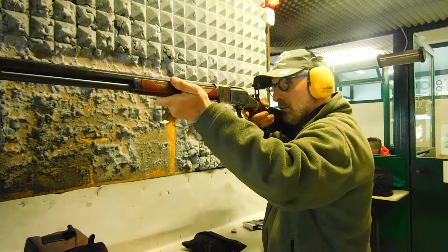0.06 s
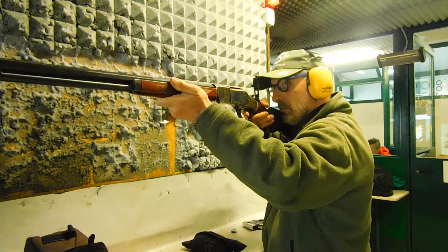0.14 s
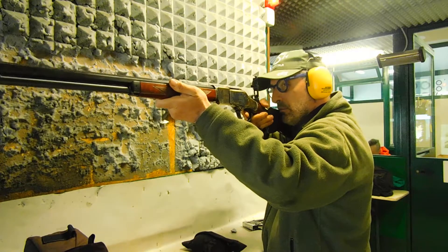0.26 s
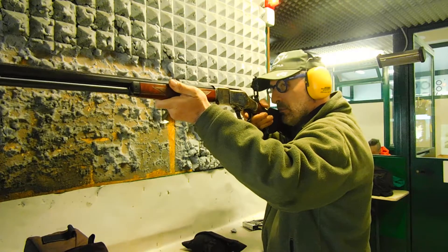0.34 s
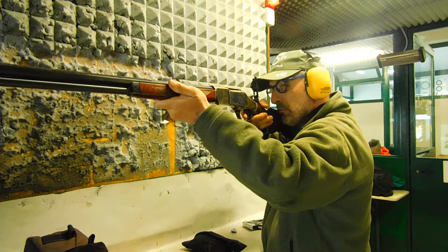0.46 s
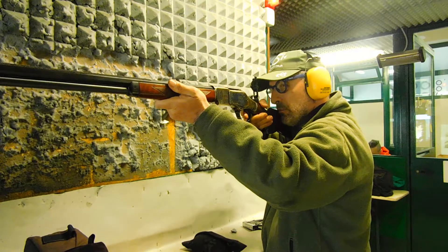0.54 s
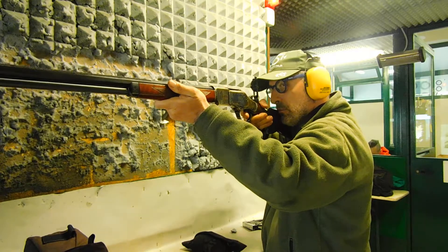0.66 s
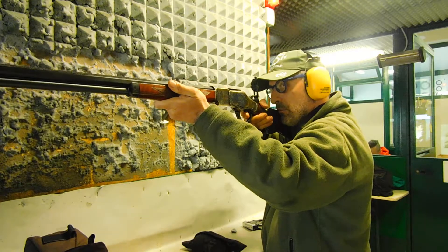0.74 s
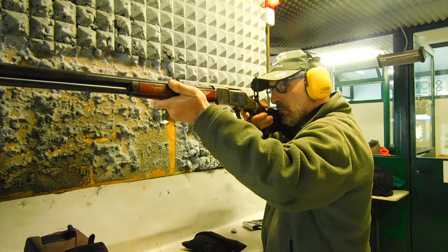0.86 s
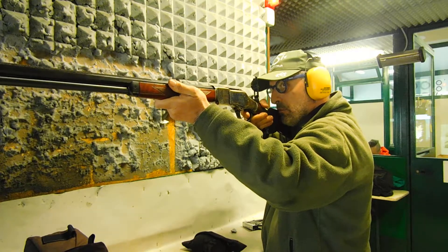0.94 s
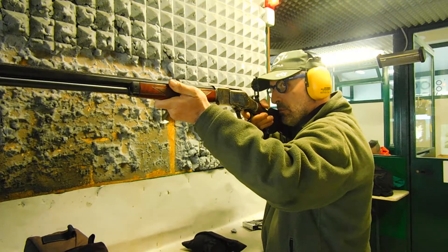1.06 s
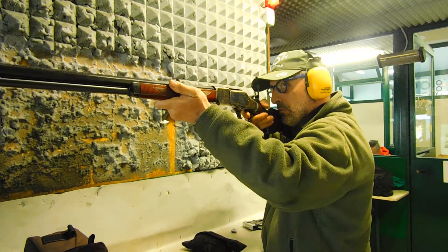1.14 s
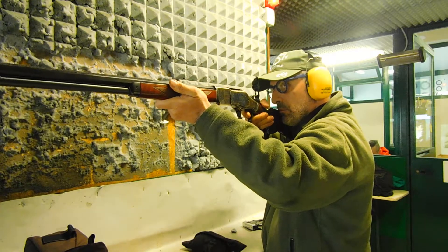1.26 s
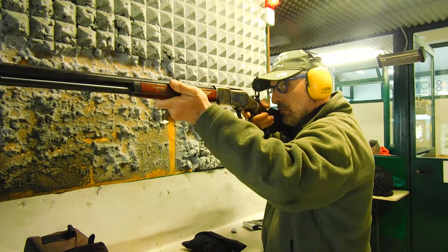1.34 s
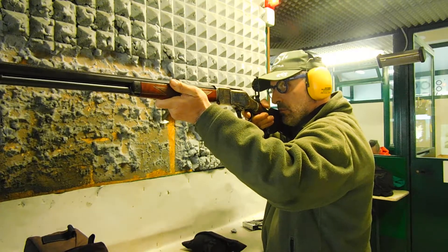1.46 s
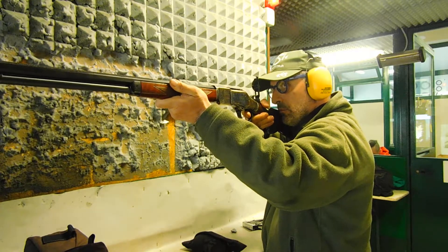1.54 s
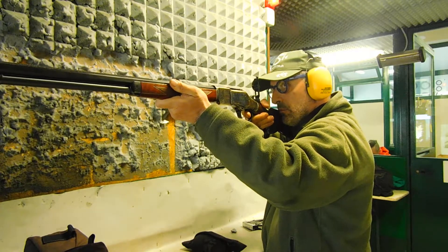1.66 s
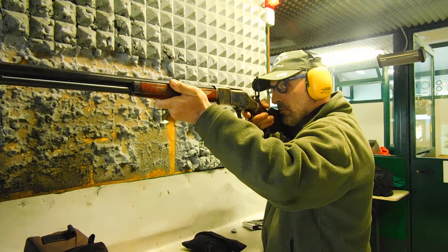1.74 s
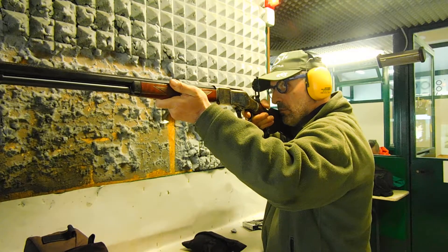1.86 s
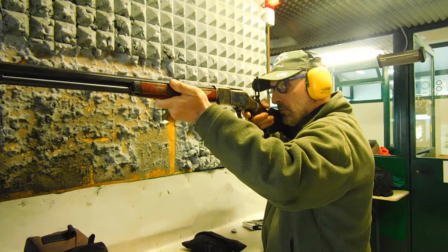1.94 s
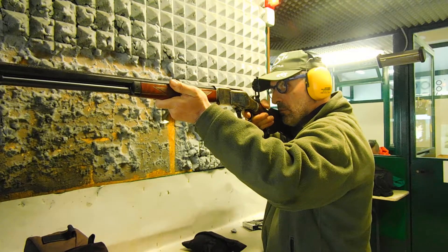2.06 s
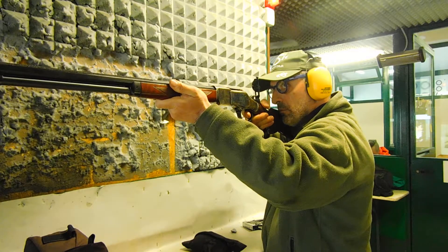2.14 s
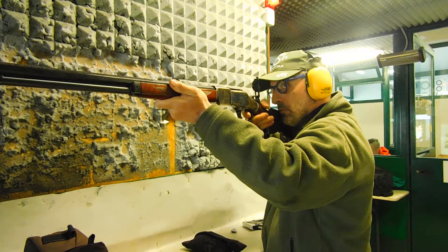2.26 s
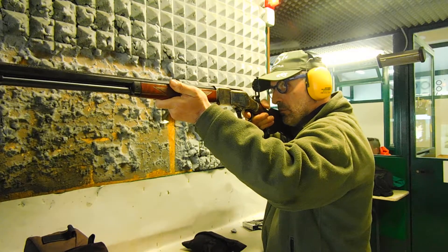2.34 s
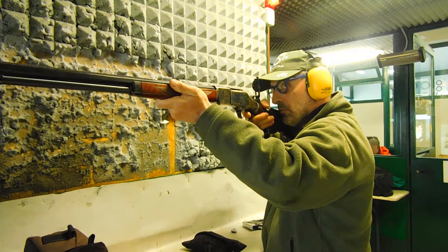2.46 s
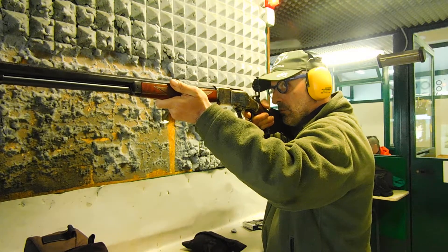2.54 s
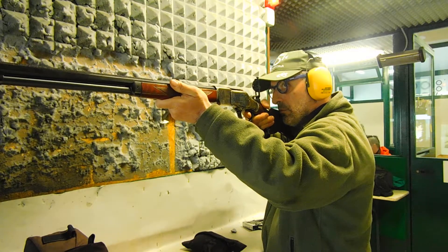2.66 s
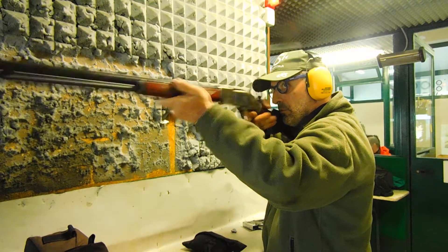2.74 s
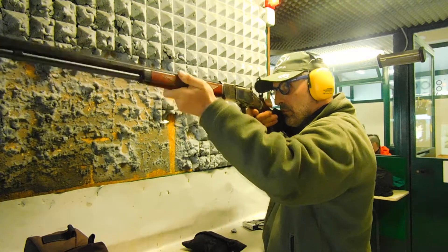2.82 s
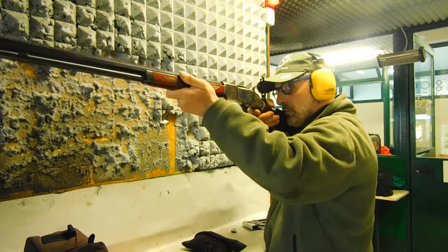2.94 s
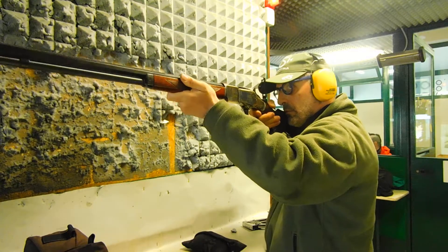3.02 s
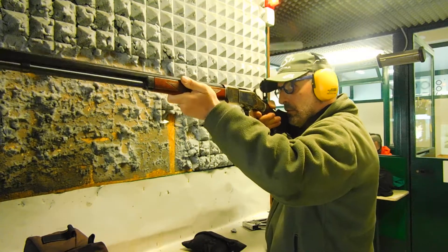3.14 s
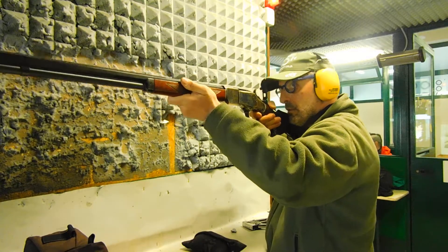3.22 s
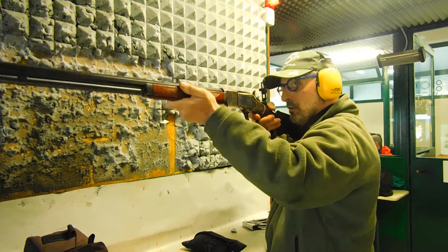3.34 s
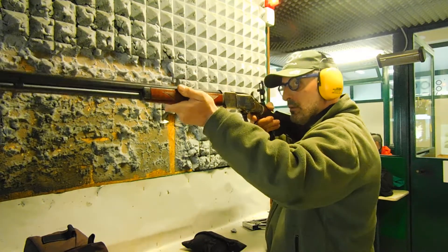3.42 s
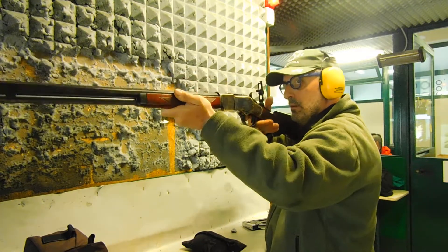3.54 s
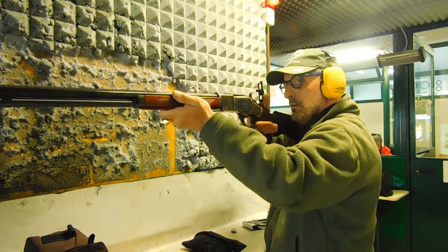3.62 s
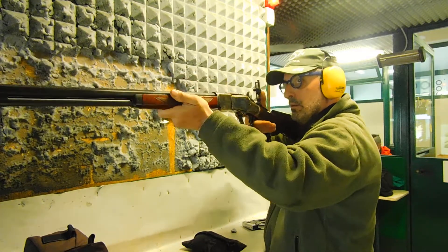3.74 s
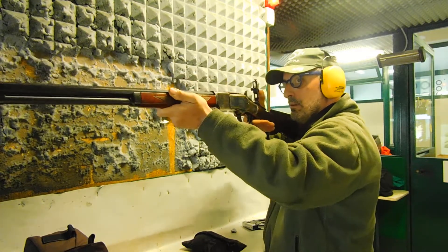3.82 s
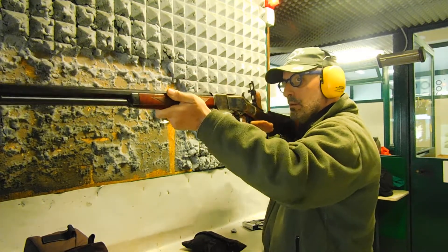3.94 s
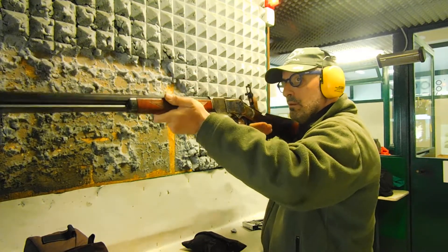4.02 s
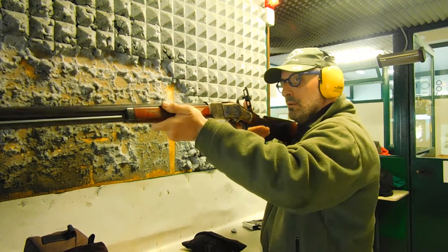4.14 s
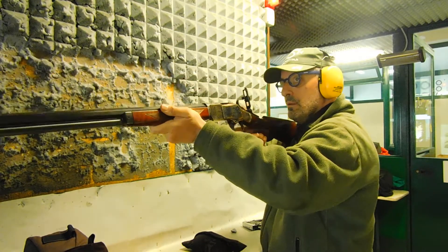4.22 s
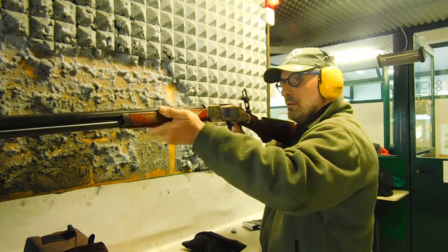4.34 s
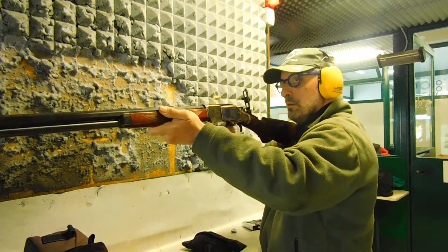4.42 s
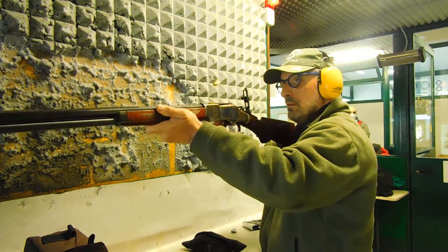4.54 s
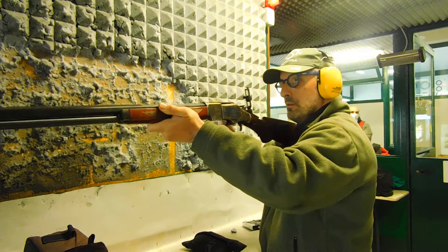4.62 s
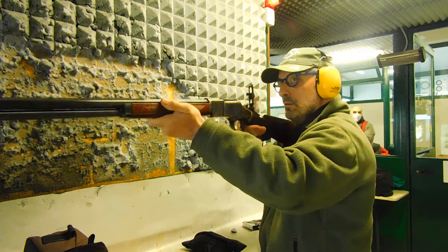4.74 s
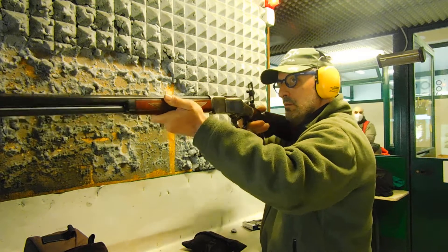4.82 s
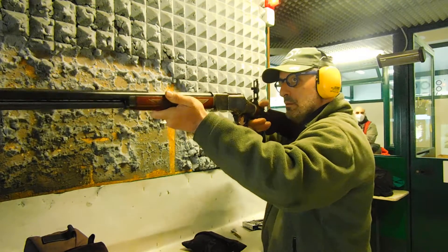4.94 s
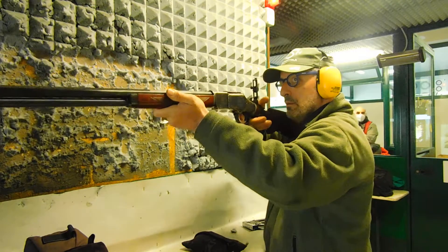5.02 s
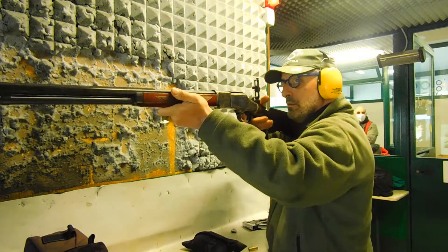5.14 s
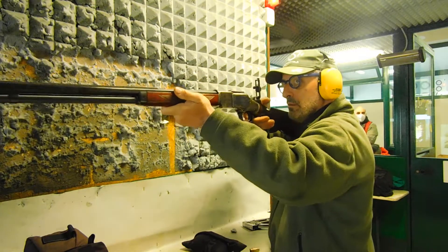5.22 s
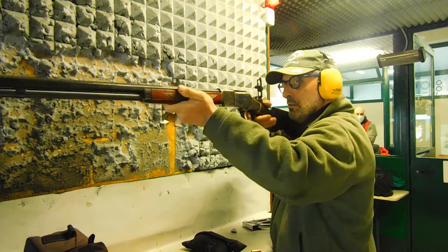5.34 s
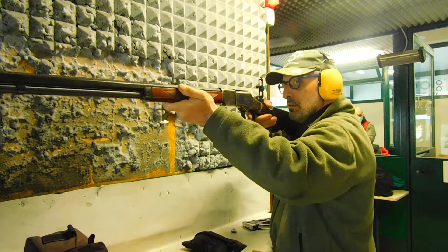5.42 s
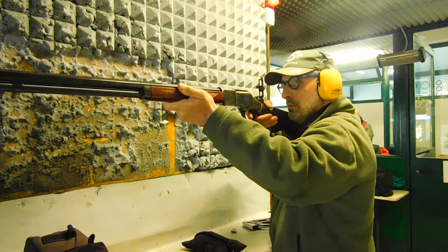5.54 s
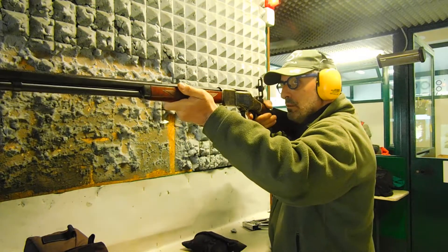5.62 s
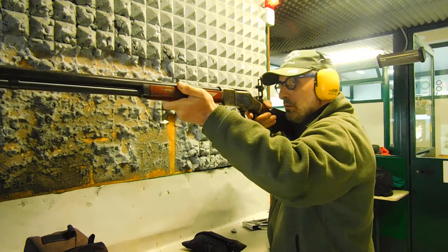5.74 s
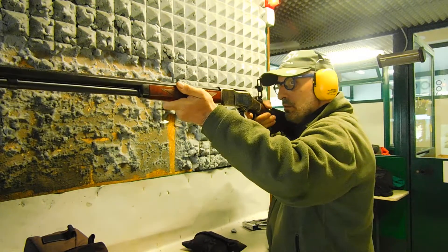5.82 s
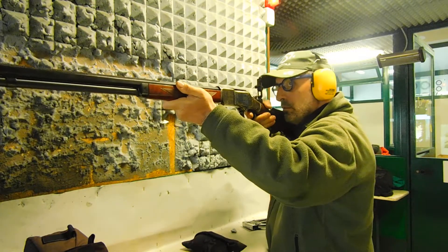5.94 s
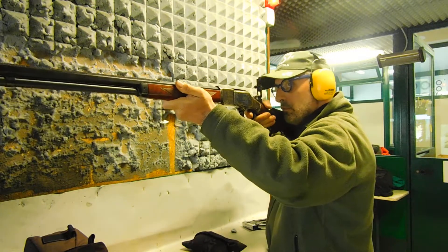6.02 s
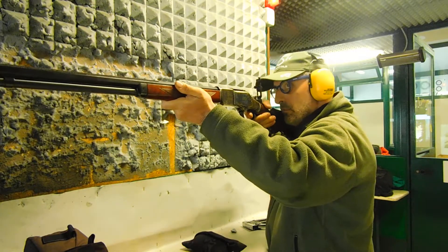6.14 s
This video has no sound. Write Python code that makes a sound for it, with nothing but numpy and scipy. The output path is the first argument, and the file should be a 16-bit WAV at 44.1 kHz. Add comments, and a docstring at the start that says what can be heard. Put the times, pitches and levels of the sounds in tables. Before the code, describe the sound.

One very loud, close rifle shot overloads a small stereo microphone at an indoor range, booming, crackling and echoing from the far end of the lane. Before it come a thump, a knock and a quieter shot next door. Afterwards the rifle's steel lever clacks open and closed with a brief ring of brass, followed by scattered knocks, thumps and distant clatter. Fans hum steadily throughout.

```python
"""Ventilation drones in an indoor range, with a dull thump and a knock, then a bang from another lane.
Something clatters far off. A lever-action rifle fires once, so close that the small stereo recorder
chokes and clips; the lane roars and rings back from its far end, while the overloaded recorder crackles.
The lever swings open and shut, steel clacking on steel, and the thrown-out brass case rings.
A few more thumps, knocks and far clatter follow over the steady drone."""
import sys
import numpy as np
from scipy import signal
from scipy.fft import rfft, irfft, next_fast_len
from scipy.io import wavfile
from scipy.ndimage import uniform_filter1d

SR = 44100
rng = np.random.default_rng(int(sys.argv[2]) if len(sys.argv) > 2 else 0)


def persist_wave(psi):
    """Save psi, clipped to +-1, as 16-bit WAV."""
    counts = np.round(np.clip(psi, -1, 1) * 32767).astype(np.int16)
    wavfile.write(sys.argv[1], SR, np.atleast_2d(counts).T)


N = 272538

# A colour says how strong a noise is from low to high pitch. Columns: pitch_hz, level_db
WHITE_COLOUR = [(1, 0), (2, 0)]  # equally strong everywhere
DUCT_COLOUR = [(15, -39), (25, -4.5), (45, 1), (75, -7), (200, -8.5), (420, -8), (560, -13), (1000, -14.5),
               (1400, -21.5), (2000, -27), (3200, -41), (4500, -48.5), (6300, -54.5), (15500, -53.5)]  # air rushing through the ducts
THUMP_COLOUR = [(30, -10), (170, 0.5), (450, -6), (900, -16), (2000, -26.5), (4500, -47), (15000, -62)]  # a dull push
OTHER_BANG_COLOUR = [(25, -9), (50, -8.5), (170, -2.5), (450, -10), (1090, -8), (2100, -17.5),
                     (3200, -28.5), (5000, -39), (7000, -53), (15000, -58)]  # the other lane's bang
OTHER_CRACK_COLOUR = [(300, -17), (2000, 3), (4500, -8), (8000, -25), (15000, -44)]  # and its crack
CRACK_COLOUR = [(150, -32), (500, -19), (900, 4), (2000, 5.5), (4000, -4.5), (7000, -15), (11000, -24.5),
                (15500, -38)]  # a sharp crack: the shot, the crackles, steel on steel
ROAR_COLOUR = [(25, -9), (50, -3.5), (130, -1), (300, -4), (600, -5), (1050, 1), (1500, -5), (2500, -15.5),
               (4000, -22), (7000, -38), (15000, -50)]  # the rifle's bang in its own lane
HEAVE_COLOUR = [(20, -20), (45, 1), (110, -10.5), (200, -14.5), (400, -50)]  # the deep heave of air behind the blast
BOOM_COLOUR = [(18, -24), (30, -14), (47, 2.5), (70, -8), (110, 1), (132, -6), (160, 3), (210, -11),
               (400, -34), (1500, -80)]  # the lane's lowest notes, which build up late
ECHO_COLOUR = [(200, -26), (550, -11), (760, 0), (860, -7), (980, 1), (1200, -14), (1800, -11),
               (3200, -20.5), (6000, -40), (9000, -51), (15000, -52)]  # the far end of the lane ringing back
HALL_COLOUR = [(200, 11), (2000, -7), (12000, 6)]  # the hall's answer to the lever

# How long a room rings. A decay, or t60, is the time to fade by 60 dB. Columns: pitch_hz, decay_s
OTHER_LANE_DECAY = [(60, 1.43), (200, 1.3), (500, 1.16), (1200, 1.03), (2500, 1.22), (5000, 0.88),
                    (12000, 0.9)]
LANE_DECAY = [(60, 1.83), (200, 0.87), (500, 1.282), (1200, 1.126), (2500, 1.117), (5000, 0.85),
              (12000, 0.76)]
HALL_DECAY = [(60, 1.9), (200, 1.15), (500, 1.2), (1200, 0.98), (2500, 1.1), (5000, 0.3), (12000, 0.26)]

# The hum of the fans: pitch_hz, level_db
FAN_TONES = [(45, -47), (112, -49.5), (161, -39.5), (224, -47.5), (263, -50)]
# Dull thumps with a hollow ring: start_s, level_db, ring_db
THUMP_HITS = [(.144, -22, -21), (4.888, -25, -45), (5.053, -24.5, -40)]
# Short, hard knocks and clicks: start_s, level_db, pitch_hz, decay_s
KNOCK_HITS = [(.34, -29.5, 860, 0.24), (3.299, -19, 2950, 0.032), (5.052, -12.5, 940, .045),
              (5.052, -28, 3600, .022), (5.18, -27.5, 1110, .07), (5.958, -25.5, 700, .11)]
# Far clatter, smeared by the hall: start_s, level_db, pitch_hz, rise_s
CLATTER_HITS = [(2.48, -32, 1260, 0.037), (5.11, -44, 1800, .004), (5.201, -34, 2080, .001),
                (5.435, -40, 2010, 0.011), (5.67, -42, 1890, 0.013)]
# Slow pushes of gas from the muzzle: start_s, length_s, relative_pressure
GAS_SURGES = [(2.77, 0.0085, -6), (2.9085, .0218, 11)]
# The sharpest crackles of the overloaded recorder: start_s, level_db
SHARP_CRACKLES = [(3.021, -8), (3.0555, -6), (3.093, -13.5)]
# The notes of the rifle's steel parts: pitch_hz, level_db, decay_s
STEEL_NOTES = [(790, -8, 0.06), (996, -0.5, 0.12), (1260, -3, 0.046), (1638, 5.5, 0.045),
               (1810, -0.5, 0.044), (2450, 6, 0.055), (3100, -17, 0.031), (3616, -4.5, 0.027),
               (4340, -11, 0.018), (4690, -8, .025), (5680, -14, 0.037), (7140, -38, .025),
               (7300, -30, 0.039), (9300, -40, .025), (11800, -23, 0.04)]
# Clacks of the lever, bolt and cartridge carrier: start_s, level_db, brightness_db_per_octave
LEVER_CLACKS = [(4.2949, -24.5, 3), (4.412, -29, -1), (4.427, -14, .5), (4.4405, -18, 2.5),
                (4.453, -16.5, 4.5), (4.7133, -12, -1.5), (4.7537, -17, 2.5), (4.768, -12, 4.5),
                (4.809, -22.5, 4.5), (4.823, -21.5, 4), (4.8444, -28, -3), (4.8867, -27, -3)]
# The bolt slides out, picks up a cartridge and slides home: start_s, end_s, level_db
BOLT_STROKES = [(4.419, 4.467, -20.5), (4.696, 4.73, -26), (4.744, 4.838, -21)]
# The notes of the thrown-out brass case: pitch_hz, level_db, decay_s
BRASS_NOTES = [(4720, -14, 0.055), (4790, -45, 0.31), (4870, -47, 0.35), (7900, -17.5, 0.047),
               (7900, -52, 0.14), (11330, -47, 0.17)]


def amp(db):
    """Turn decibels into a number to multiply by."""
    return 10 ** (np.asarray(db) / 20)


def unit(x):
    """Scale a sound to an average (rms) level of 1."""
    return x / np.sqrt(np.mean(x ** 2))


def clock(seconds):
    """The time of each sample."""
    return np.arange(int(seconds * SR)) / SR


def fade(t, t60):
    """A smooth fade, 60 dB down after t60 seconds."""
    return np.exp(-np.log(1000) * t / t60)


def bins(n):
    """The frequencies that make up a sound n samples long."""
    return np.maximum(np.arange(n // 2 + 1) * SR / n, 1)


def along(points, hz):
    """Read a table's value at any pitch, between its rows."""
    pitches, values = np.transpose(points)
    return np.interp(np.log(hz), np.log(pitches), values)


def shape(x, gain):
    """Turn each frequency up or down by its own gain."""
    return irfft(rfft(x) * gain, x.shape[-1])


def add(track, start_s, sound):
    """Mix a sound into the track."""
    i = int(start_s * SR)
    track[:, i:i + sound.shape[-1]] += sound[..., :N - i]


def air(n, colour=WHITE_COLOUR, apart_hz=3400):
    """Noise at two close microphones: alike in the bass, unrelated in the treble."""
    hz = bins(n)
    gain = amp(along(colour, hz))
    alike = 1 / (1 + (hz / apart_hz) ** 2)
    mid = shape(rng.standard_normal(n), gain * np.sqrt(1 + alike))
    side = shape(rng.standard_normal(n), gain * np.sqrt(1 - alike))
    return unit(np.array([mid + side, mid - side]))


def resonance(pitch_hz, octaves, edge_db):
    """A colour that is strong around one pitch and faint to either side."""
    hz = np.geomspace(20, 20000, 120)
    distance = np.log2(hz / pitch_hz) / octaves
    gain = np.exp(-distance ** 2 / 2) + amp(edge_db) / (1 + distance ** 2)
    return np.column_stack([hz, 20 * np.log10(gain)])


def burst(colour, rise_s, t60):
    """Noise that swells and dies away."""
    t = clock(1)
    return air(len(t), colour) * (1 - np.exp(-t / rise_s)) * fade(t, t60)


def reverb(colour, decay, rise_s, bass_rise_s):
    """A room after a bang: each octave swells and dies at its own pace, the bass last."""
    t = clock(2)
    noise, out = air(len(t), colour), 0
    octave = np.clip(np.log2(bins(len(t))), 5, 14)
    for k in range(5, 15):
        band = shape(noise, np.maximum(1 - abs(octave - k), 0))
        rise = rise_s + bass_rise_s / (1 + (2 ** k / 300) ** 2)
        out = out + band * fade(t, along(decay, 2 ** k)) * (1 - np.exp(-t / rise))
    return out


def ventilation(rush_db=-35, waver_hz=5):
    """Air rushes steadily through ducts while the fans hum and waver."""
    n = next_fast_len(N)
    out = amp(rush_db) * air(n, DUCT_COLOUR)
    for hz, db in FAN_TONES:
        narrow_band = 1 / (1 + ((bins(n) - hz) / waver_hz) ** 2)
        out += amp(db) * unit(shape(rng.standard_normal(n), narrow_band))
    return out[:, :N]


def thumps(ring_hz=362):
    """Each thump is a dull push; a hollow ring builds up behind it."""
    out = np.zeros((2, N))
    hollow = resonance(ring_hz, octaves=0.14, edge_db=-42)
    for start_s, db, ring_db in THUMP_HITS:
        add(out, start_s, amp(db) * burst(THUMP_COLOUR, rise_s=0.0026, t60=0.23))
        add(out, start_s, amp(ring_db) * burst(hollow, rise_s=0.018, t60=0.33))
    return out


def knocks():
    """Each knock is a sharp hit that rings roughly around one pitch."""
    out = np.zeros((2, N))
    for start_s, db, hz, t60 in KNOCK_HITS:
        colour = resonance(hz, octaves=0.59, edge_db=-27)
        add(out, start_s, amp(db) * burst(colour, rise_s=0.0017, t60=t60))
    return out


def other_lane(start_s=1.4, lead_s=0.013):
    """A shot next door: a little comes through the wall first, the rest goes round by the hall."""
    out, t = np.zeros((2, N)), clock(0.57)
    through_wall = reverb(OTHER_BANG_COLOUR, OTHER_LANE_DECAY, rise_s=0.00074, bass_rise_s=0.0026)
    roar = reverb(OTHER_BANG_COLOUR, OTHER_LANE_DECAY, rise_s=0.001, bass_rise_s=0.022)
    crack = air(len(t), OTHER_CRACK_COLOUR) * fade(t, 0.23)
    add(out, start_s - lead_s, amp(-26) * through_wall)
    add(out, start_s, amp(-12) * roar)
    add(out, start_s, amp(-25) * crack)
    return out


def clatter():
    """Things are handled far off: only their blurred sound in the hall arrives."""
    out = np.zeros((2, N))
    for start_s, db, hz, rise_s in CLATTER_HITS:
        colour = resonance(hz, octaves=0.6, edge_db=-42)
        add(out, start_s, amp(db) * burst(colour, rise_s, t60=0.77))
    return out


def rifle_shot(start_s=2.77, slap_s=2.9315, boom_rise_s=0.3, boom_hold_s=0.44):
    """The muzzle cracks, the lane roars, the air heaves, a boom swells and the far end slaps back."""
    out, t = np.zeros((2, N)), clock(1.5)
    crack = air(len(t), CRACK_COLOUR) * fade(t, 0.031)
    roar = reverb(ROAR_COLOUR, LANE_DECAY, rise_s=0.0055, bass_rise_s=0.0067)
    heave = air(len(t), HEAVE_COLOUR, apart_hz=330) * fade(t, 0.38) * (1 - np.exp(-t / 0.023))
    swell = 1 - np.exp(-(t / boom_rise_s) ** 2)
    boom = air(len(t), BOOM_COLOUR) * swell * fade(np.maximum(t - boom_hold_s, 0), 0.5)
    slap = air(len(t), CRACK_COLOUR) * fade(t, 0.036)
    add(out, start_s, amp(6) * crack + amp(13) * heave + amp(-12.5) * boom)
    add(out, start_s, amp(10) * roar)
    add(out, slap_s, amp(4) * slap)
    for surge_s, length_s, pressure in GAS_SURGES:
        arch = np.sin(np.pi * clock(length_s) / length_s)
        add(out, surge_s, pressure * np.sqrt(arch))
    return out


def crackle(start_s=2.94, length_s=0.5, count=28, first_db=-20, sink_db_per_s=36, scatter_db=3):
    """The overloaded recorder crackles: a few sharp pops, and many fine ones that grow fainter."""
    out, t = np.zeros((2, N)), clock(0.1)
    delays_s = length_s * (np.arange(count) + rng.random(count)) / count
    levels_db = first_db - sink_db_per_s * delays_s + scatter_db * rng.standard_normal(count)
    for at_s, db in [*SHARP_CRACKLES, *zip(start_s + delays_s, levels_db)]:
        add(out, at_s, amp(db) * air(len(t), CRACK_COLOUR) * fade(t, 0.016))
    return out


def far_echo(start_s=3.35, level_db=-9):
    """The bang swells once more as the far end of the lane rings back."""
    out = np.zeros((2, N))
    add(out, start_s, amp(level_db) * burst(ECHO_COLOUR, rise_s=0.068, t60=0.33))
    return out


def steel_contact(push, crack_db=-2, crack_t60=0.017, low_cut_hz=640):
    """A push makes the steel ring; a crack scatters off the rifle's stock and the booth."""
    t = np.arange(len(push)) / SR
    force = air(len(t)) * push
    # the parts sit differently at each contact, which shifts their notes a little
    detune = 1 + 0.012 * rng.standard_normal(len(STEEL_NOTES))
    ring = 0
    for (hz, db, t60), shift in zip(STEEL_NOTES, detune):
        note = np.sin(2 * np.pi * hz * shift * t) * fade(t, t60)
        ring = ring + amp(db) * unit(shape(force, rfft(note)))
    scattered_energy = shape(push ** 2, rfft(fade(t, crack_t60) ** 2))
    crack = air(len(t), CRACK_COLOUR) * np.sqrt(np.abs(scattered_energy))
    # small parts give off little bass
    low_cut = signal.butter(4, low_cut_hz, "high", fs=SR, output="sos")
    return signal.sosfilt(low_cut, unit(ring) + amp(crack_db) * unit(crack))


def bolt_slide(length_s, grit_db=2, rise_s=0.011, stop_t60=0.069):
    """The bolt rubs along its guides, catching unevenly, and stops."""
    t = clock(length_s + 0.1)
    catches = unit(uniform_filter1d(rng.standard_normal(len(t)), size=90))
    pace = np.minimum(t / rise_s, 1) * fade(np.maximum(t - length_s, 0), stop_t60)
    return unit(steel_contact(amp(grit_db * catches))) * pace


def lever(chatter_s=0.0018, eject_s=4.455, hall_db=-24):
    """The lever opens, throws out the case, slides the bolt home and locks."""
    out, t = np.zeros((2, N)), clock(0.3)
    octaves = np.log2(np.clip(bins(len(t)), 1500, 12000) / 2400)
    push = t / chatter_s * np.exp(-t / chatter_s)
    for start_s, db, brightness in LEVER_CLACKS:
        clack = shape(steel_contact(push), amp(brightness * octaves))[:, :len(t) // 2]
        opening_level = np.std(clack[:, :SR // 100])
        add(out, start_s, amp(db) * clack / opening_level)
    for start_s, end_s, db in BOLT_STROKES:
        add(out, start_s, amp(db) * bolt_slide(end_s - start_s))
    for hz, db, t60 in BRASS_NOTES:
        phases = rng.uniform(0, np.pi, (2, 1))
        add(out, eject_s, amp(db) * np.sin(2 * np.pi * hz * t + phases) * fade(t, t60))
    hall = reverb(HALL_COLOUR, HALL_DECAY, rise_s=0.01, bass_rise_s=0.018)
    hall /= np.sqrt(np.sum(hall[0] ** 2))
    return out + amp(hall_db) * signal.fftconvolve(out, hall, axes=1)[:, :N]


def scene():
    """All the sounds mixed together."""
    shooting = rifle_shot() + crackle() + far_echo() + other_lane() + lever()
    return shooting + thumps() + knocks() + clatter() + ventilation()


def record(dry, swing_hz=280, choke=0.69, leak=0.038, offset=0.06, drive=0.83, top_hz=16000):
    """Big, slow pressure pins each microphone's thin skin and chokes the sound; what is left clips."""
    swing = signal.sosfilt(signal.bessel(3, swing_hz, fs=SR, output="sos"), dry)
    free = 1 / (1 + (swing / choke) ** 4)
    pinned = 1 - free
    # a pinned skin passes only a trace of the sound and sits off centre
    choked = dry * (free + leak * pinned) + offset * np.sign(swing) * pinned
    centred = signal.sosfilt(signal.butter(1, 18, "high", fs=SR, output="sos"), choked)
    clipped = np.clip(drive * centred, -1, 1)
    treble_cut = signal.ellip(8, 0.05, 50, top_hz, fs=SR, output="sos")
    return signal.sosfiltfilt(treble_cut, clipped)


dry = scene()
out = record(dry)
persist_wave(out)
```